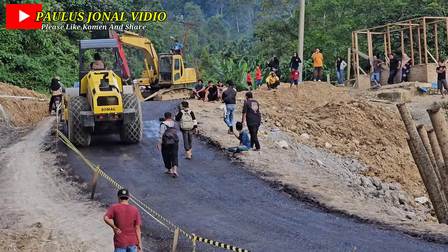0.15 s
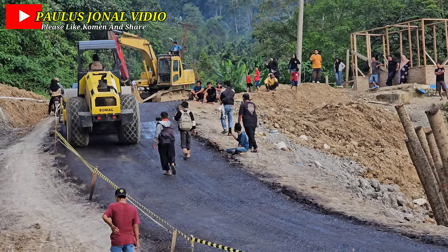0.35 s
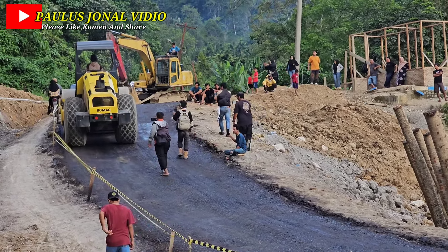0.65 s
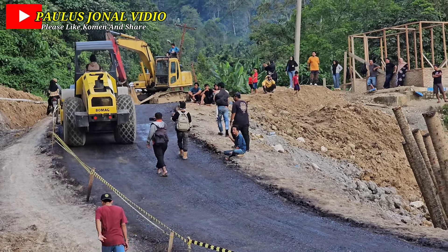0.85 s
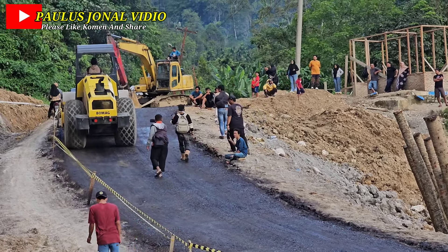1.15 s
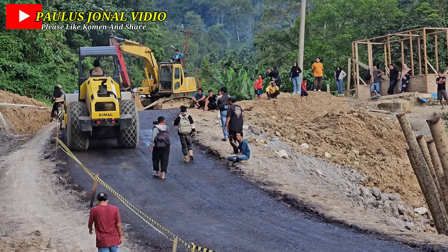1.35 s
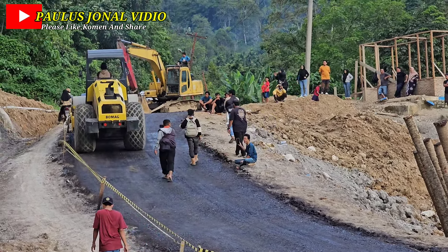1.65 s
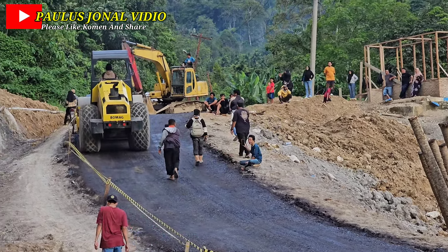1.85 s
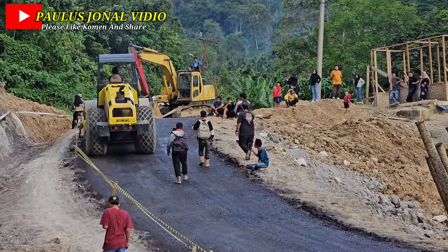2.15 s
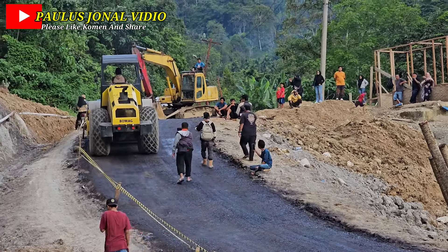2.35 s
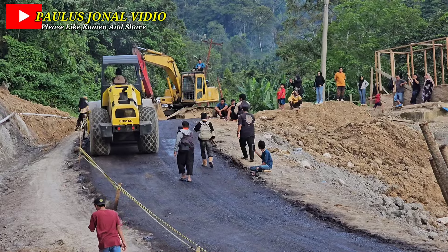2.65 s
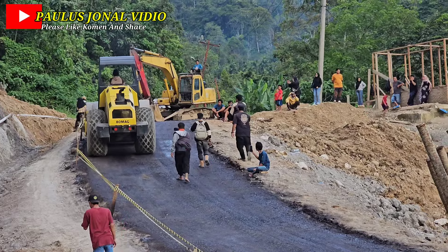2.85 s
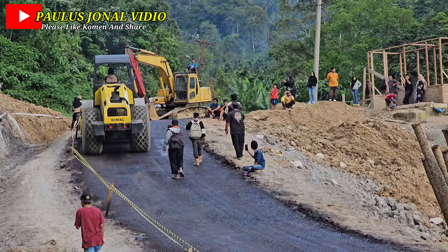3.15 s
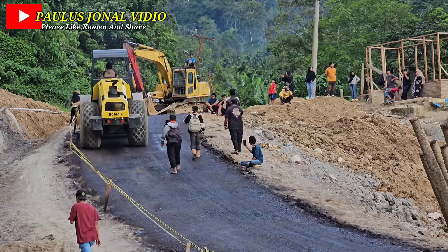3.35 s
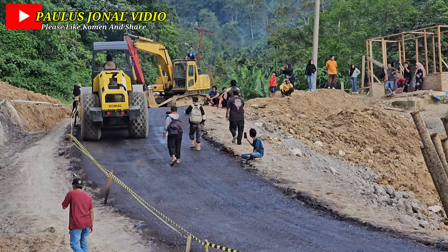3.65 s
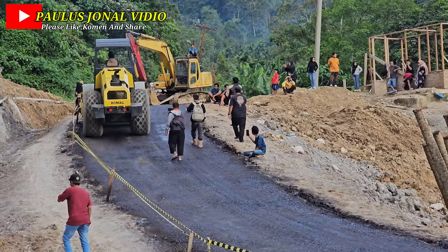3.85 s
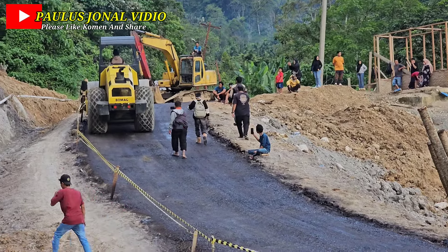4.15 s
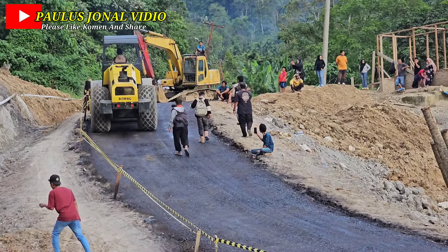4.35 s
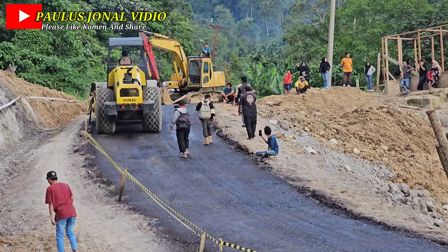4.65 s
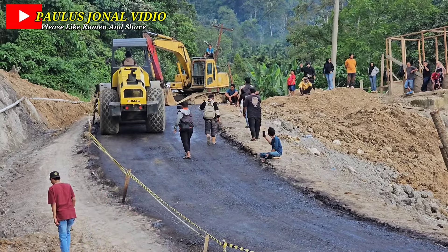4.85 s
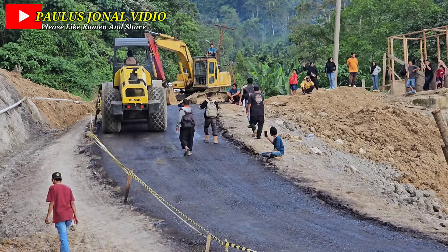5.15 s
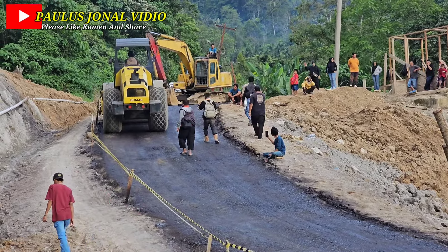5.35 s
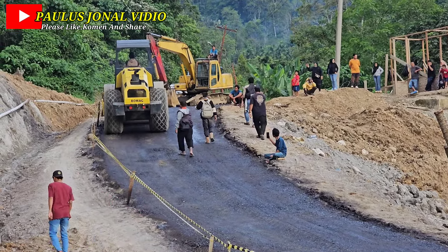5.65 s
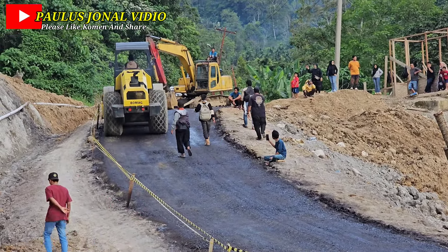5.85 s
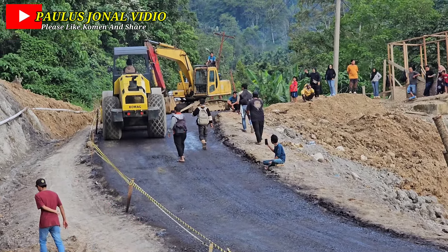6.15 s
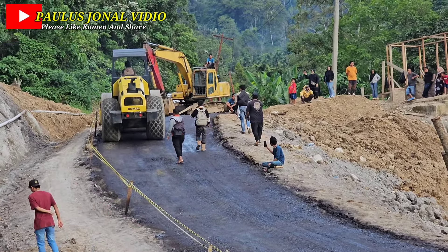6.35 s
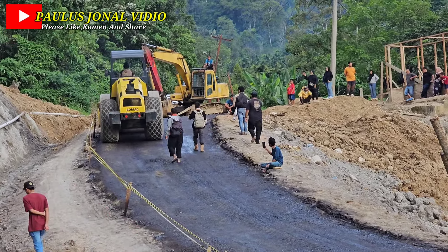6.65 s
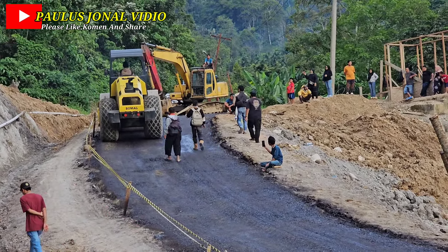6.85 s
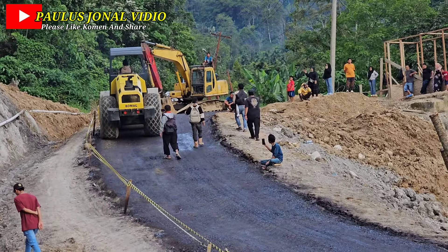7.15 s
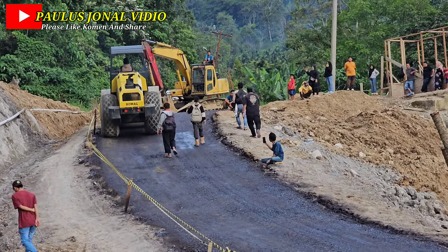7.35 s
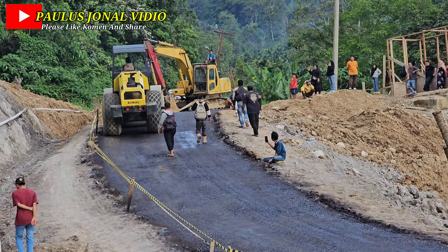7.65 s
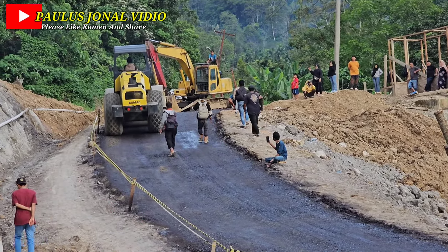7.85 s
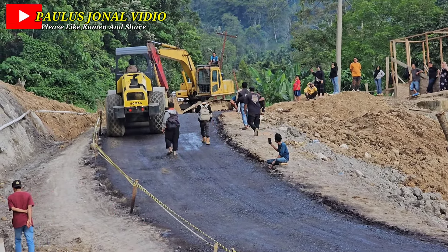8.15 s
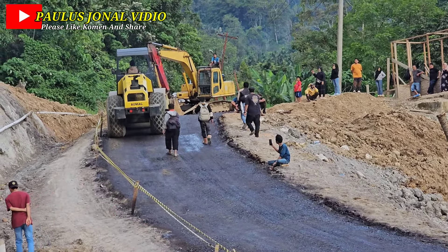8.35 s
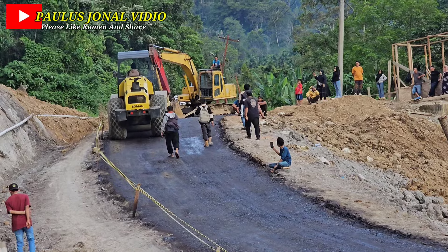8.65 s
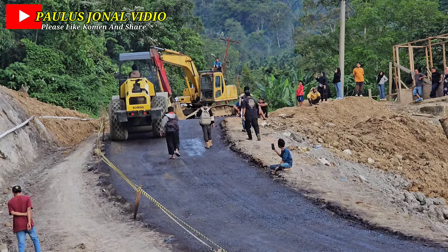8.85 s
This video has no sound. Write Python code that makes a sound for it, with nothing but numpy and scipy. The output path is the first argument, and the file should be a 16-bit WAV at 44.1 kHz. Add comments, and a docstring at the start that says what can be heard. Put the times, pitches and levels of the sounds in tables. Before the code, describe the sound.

Outdoors at a roadworks, a road roller some thirty metres away runs throughout with a very deep, steady diesel hum, a rough roar, fast clatter and a wavering hydraulic whine. Around four seconds it grows duller as it moves off and hiss on the right fades. Faint squeaks and clinks come and go; a hollow knock sounds just after six seconds. Stereo microphone in the open, at a distance.

```python
"""A deep diesel hum first: a road roller drives slowly up a freshly laid road, some thirty metres off.
Its four cylinders fire 61 times a second; tones locked to the engine add a fan and a nine-piston pump's whine.
Shaped noise, its repeating part gated by the firings, makes roar and clatter; after about 4 s it is duller
and a right-hand hiss fades. A hollow knock (ringing modes) and a few clinks (noise bursts) come from the site;
faint brief squeaks and longer thin whines are narrow bands, some gliding."""
import sys
import numpy as np
from scipy import signal
from scipy.fft import rfft, irfft
from scipy.io import wavfile

SR = 44100
rng = np.random.default_rng(int(sys.argv[2]) if len(sys.argv) > 2 else 0)


def store_pcm(level_fs):
    """Save levels as 16-bit WAV."""
    pcm = np.round(np.clip(level_fs, -1, 1) * 32767).astype(np.int16)
    wavfile.write(sys.argv[1], SR, np.atleast_2d(pcm).T)


N = 396900
TIME = np.arange(N) / SR  # s
BIN_HZ = np.maximum(np.arange(N // 2 + 1) * SR / N, 1)
CUTOFF_HZ = 15500
CYLINDERS = 4
LEFT_LEAD_NEAR_S, LEFT_LEAD_FAR_S = 0.000294, 0.000095


def from_db(db):
    """Decibels to gain."""
    return np.exp(np.asarray(db, np.float32) * np.float32(np.log(10) / 20))


def rms_one(x):
    """Scale to unit power."""
    return x / np.sqrt(np.mean(x ** 2) + 1e-20)


def in_time(rows):
    """Each column of a time table at every sample."""
    s, *columns = np.transpose(rows)
    return [np.interp(TIME, s, column) for column in columns]


def at_hz(rows, hz):
    """Each column of a spectrum table at the given frequencies, on a log scale."""
    points, *columns = np.transpose(rows)
    return [np.interp(np.log(hz), np.log(points), column) for column in columns]


def drift(rate_hz):
    """Slow chance with spread 1, drawn at every 100th sample and joined by straight lines."""
    step = 100
    draws = rng.standard_normal(N // step + 2)
    hz = np.arange(len(draws) // 2 + 1) * SR / N
    lowpass = 1 / (1 + (hz / rate_hz) ** 2)
    slow = rms_one(irfft(rfft(draws) * lowpass, len(draws))).astype(np.float32)
    between = np.arange(step, dtype=np.float32) / step
    return (slow[:-1, None] + np.diff(slow)[:, None] * between).ravel()[:N]


def swell(period_s, crest_s):
    """A regular rise and fall between -1 and 1."""
    return np.cos(2 * np.pi * (TIME - crest_s) / period_s)


def bell(hz, width_hz):
    """A bell-shaped band of height 1."""
    return np.exp(-0.5 * ((BIN_HZ - hz) / width_hz) ** 2)


def pan(left_db):
    """Left and right gains for a left minus right level difference."""
    return from_db(np.float32([[0.5], [-0.5]]) * np.float32(left_db))


# stereo image: [f/Hz, left-right likeness/0-1, left minus right near/dB, same when farther/dB]
STEREO_IMAGE = [(61, 1, 5, 1.5), (250, 0.94, -2, 1), (535, 0.89, 10, 1.5), (830, 0.9, -4, 2.5),
                (1200, .9, 5.5, 1.5), (1990, 0.8, 7, 2.5), (3060, 0.4, -2, 1), (5140, .58, -8.5, -0.5),
                (7040, 0.6, 2, 6), (10000, 0.3, 11.5, 7.5), (15000, .15, -4, 3.5)]


def line_side(cycle, multiple, away):
    """Left minus right dB of a tone as the roller moves off."""
    _, near_db, far_db = at_hz(STEREO_IMAGE, multiple * cycle[-1] / TIME[-1])
    return near_db + (far_db - near_db) * away


BASS_TURN_RAD_HZ = 15  # advances the right side's phase by this / f: strongest in the bass


def line(cycle, multiple, level_db, left_db, shift_turns=0):
    """One stereo sine locked to the engine cycle, its right side shifted in phase."""
    hz = multiple * cycle[-1] / TIME[-1]
    turns = multiple * cycle + shift_turns
    angle = 2 * np.pi * (turns - np.floor(turns)).astype(np.float32)
    right_lag_rad = 2 * np.pi * hz * LEFT_LEAD_FAR_S - BASS_TURN_RAD_HZ / hz
    tone = np.sin(angle - np.float32([[0], [right_lag_rad]]))
    return 2 ** 0.5 * from_db(level_db) * pan(left_db) * tone


HUM_DB, HUM_SWING_DB, HUM_SWELL_S, HUM_CREST_S = -7.5, 0.72, 4.25, 2.8  # slow swell about a mean
HUM_LEFT_DB = 1.6
BEAT_S, BEAT_CREST_S = 1.39, 1.55  # overtones beat with an echo as the roller moves
# exhaust overtones before the beat: [firing harmonic, start level/dB, fade/dB per s,
# share of the whine's swing/dB per dB, echo share (negative: cancels at the crest)]
EXHAUST_OVERTONES = [(2, -24, 0.46, 0, 0.27), (3, -31.5, 0.5, 0.4, -0.53)]


def exhaust(cycle, away, hum_flutter_db=0.25, overtone_flutter_db=1.4):
    """Four firings a cycle; the silencer leaves a deep hum, its overtones locked to it and beating with an echo."""
    hum_db = HUM_DB + HUM_SWING_DB * swell(HUM_SWELL_S, HUM_CREST_S) + hum_flutter_db * drift(6.4)
    out = line(cycle, CYLINDERS, hum_db, HUM_LEFT_DB)
    beat = swell(BEAT_S, BEAT_CREST_S)
    for harmonic, start_db, fade_db_per_s, follows, echo in EXHAUST_OVERTONES:
        multiple = CYLINDERS * harmonic
        level_db = start_db - fade_db_per_s * TIME + follows * whine_swing()
        level_db = level_db + overtone_flutter_db * drift(22)
        echo_gain = np.sqrt(1 + echo ** 2 + 2 * echo * beat)
        out += echo_gain * line(cycle, multiple, level_db, line_side(cycle, multiple, away))
    return out


# pump whine: [t/s, 2nd piston harmonic level/dB, 3rd piston harmonic level/dB]
PUMP_WHINE = [(0, -27.5, -38), (0.9, -34, -37), (2.1, -34.5, -37), (3.3, -32, -38.5), (3.95, -26, -45.5),
              (4.9, -30.5, -41), (5.6, -33, -43), (5.85, -40, -45), (6.4, -31.5, -42.5), (6.9, -29.5, -45),
              (7.3, -33.5, -46.5), (9, -35, -46.5)]


def whine_swing():
    """The 2nd piston harmonic's dB above its mean; parts of exhaust and roar swell with it."""
    whine_db = in_time(PUMP_WHINE)[0]
    return whine_db - whine_db.mean()


# pump overtones: [piston harmonic, level near/dB, level farther/dB]
PUMP_OVERTONES = [(5, -58.5, -50.5), (6, -56.5, -54), (7, -59, -49), (8, -63, -59), (9, -60, -64),
                  (11, -65, -61), (16, -66.5, -67)]


def pump(cycle, away, flutter_db=1.5, overtone_flutter_db=3.5, wander_turns=0.098):
    """Nine pistons, two turns a cycle: a whine on harmonics 2 and 3, with thin, wavering overtones."""
    strokes = 18  # per engine cycle
    out = 0
    for harmonic, whine_db in enumerate(in_time(PUMP_WHINE), 2):
        multiple = strokes * harmonic
        level_db = whine_db + flutter_db * drift(5.6)
        out = out + line(cycle, multiple, level_db, line_side(cycle, multiple, away))
    for harmonic, near_db, far_db in PUMP_OVERTONES:
        multiple = strokes * harmonic
        level_db = near_db + (far_db - near_db) * away + overtone_flutter_db * drift(13)
        side_db = line_side(cycle, multiple, away)
        out += line(cycle, multiple, level_db, side_db, wander_turns * drift(16))
    return out


FAN_PER_CYCLE = 15.953  # blade passes, just under the 4th firing harmonic
# fan tone: [t/s, level/dB]
FAN_TONE = [(0, -28), (.3, -30), (.85, -36.5), (1.4, -33), (2.2, -37.5), (2.7, -33), (3.5, -37),
            (4.15, -28.5), (4.65, -43), (5.1, -35), (6.3, -39.5), (7.1, -35), (7.7, -42.5), (9, -48)]


def fan(cycle, away, flutter_db=1.5):
    """The belt-driven cooling fan hums at its blade rate."""
    level_db = in_time(FAN_TONE)[0] + flutter_db * drift(13)
    return line(cycle, FAN_PER_CYCLE, level_db, line_side(cycle, FAN_PER_CYCLE, away))


# weaker lines: [multiple of the four-stroke cycle rate (tone rounds it), level near/dB, level farther/dB]
ENGINE_ORDERS = [(2, -47.5, -42.5), (3, -42, -36.5), (6, -47.5, -40), (7, -37.5, -35), (9, -41, -42),
                 (15, -41, -48), (17, -51.5, -47.5), (18, -51, -48.5), (20, -43, -46.5), (21, -46.5, -50),
                 (23, -45, -56.5), (26, -47, -56.5), (32, -60, -39.5), (34, -54.5, -45), (35, -48, -41),
                 (38, -50.5, -46.5), (39, -48.5, -48.5), (41, -43.5, -48), (42, -46.5, -49.5),
                 (44, -44.5, -47.5), (46, -47, -51), (48, -43, -57.5), (52, -42, -54.5), (55, -41.5, -50),
                 (56, -51, -51), (58, -58, -54), (60, -59, -52), (63.9, -60, -50), (66.14, -59.5, -50),
                 (77, -52, -54.5), (77.9, -55, -51.5), (85.5, -53.5, -58.5), (90, -55.5, -52.5),
                 (90.8, -56.5, -53), (94, -58, -54.5), (130.2, -59.5, -52.5)]


def engine_lines(cycle, away, waver_db=2.0, wander_turns=0.15):
    """Unequal cylinders and driven gear add weaker lines on and between the firing harmonics; echoes shift them."""
    out = 0
    for multiple, near_db, far_db in ENGINE_ORDERS:
        level_db = near_db + (far_db - near_db) * away + waver_db * drift(5.3)
        shift_turns = rng.random() + wander_turns * drift(3.0)
        side_db = line_side(cycle, multiple, away)
        out = out + line(cycle, round(multiple), level_db, side_db, shift_turns)
    return out


# unequal knock of the cylinders, in firing order: [relative level/dB]
CYLINDER_KNOCK_DB = [0.9, 0.87, -0.3, -0.9]


def firing_gate(cycle, depth=0.44, fade_per_firing=9.0):
    """Every firing starts a burst of clatter that dies before the next, over a steady floor."""
    firing = cycle * CYLINDERS
    strength = from_db(CYLINDER_KNOCK_DB)[firing.astype(int) % CYLINDERS]
    return rms_one(strength * (1 + depth * np.exp(-fade_per_firing * (firing % 1))))


RIPPLE_DB, RIPPLE_SPACING_HZ, RIPPLE_FROM_HZ = 2.5, 65.7, 3000


def ripple(count=400):
    """Chance peaks and dips, in dB, that small panels add to the treble."""
    heights = np.interp(BIN_HZ / RIPPLE_SPACING_HZ, np.arange(count), rng.standard_normal(count))
    return RIPPLE_DB * heights / (1 + (RIPPLE_FROM_HZ / BIN_HZ) ** 2)


# base spectrum of the roar: [f/Hz, density near/dB per Hz, density farther/dB per Hz]
ROAR_SPECTRUM = [(26, -54, -58.5), (103, -48.5, -50), (152.5, -46.5, -49), (186, -57, -62),
                 (215, -58.5, -64), (312, -59.5, -61.5), (480, -71, -61), (640, -65.5, -63),
                 (1180, -65.5, -67), (2480, -80.5, -75.5), (3600, -80, -80.5), (6560, -89.5, -92.5),
                 (8550, -102.7, -102.5), (11700, -92, -99.5), (15500, -102.3, -105.1)]
# resonances of block and hood: [f/Hz, width/Hz, lift near/dB, lift farther/dB]
PANEL_RESONANCES = [(585, 61, 5, 4), (760, 80, 7.5, -1.5), (835, 35, 3.5, 0), (1014, 41, -9, 5),
                    (1170, 35, 2.5, 2.5), (1420, 120, 2.5, 4), (1831, 18, 5, 6), (1946, 57, 8, 4.5),
                    (2210, 22, 1, 3), (2450, 14, 6, 0.5), (2810, 190, 8, 1), (3020, 36, 1.5, 3.5),
                    (3900, 58, 4, -0.5), (4670, 260, 9.5, 1.5), (5330, 170, 8.5, 1), (5950, 200, 4.5, -1),
                    (7600, 300, 5, 4)]
# clatter that repeats with every engine cycle: [f/Hz, share/0-1]
REPEATING_SHARE = [(200, 0.03), (500, 0.22), (1000, 0.3), (2500, 0.2), (5000, 0), (9000, 0.2)]


def roar(cycle, index, lead_s, flicker_db=0.92, grain_db=1.17):
    """Valves, injectors and fan ring block and hood: a gated pattern repeating each cycle, plus turbulence."""
    pattern = rng.standard_normal(round(SR * TIME[-1] / cycle[-1]))
    place = (cycle % 1 * len(pattern)).astype(int)
    flicker = from_db(flicker_db * drift(11))
    repeating = rfft(flicker * firing_gate(cycle) * pattern[place])
    grain = from_db(grain_db * drift(150))
    noise = flicker * grain * rng.standard_normal((3, N))
    turbulent, *scattered = rfft(noise.astype(np.float32))
    share = np.clip(at_hz(REPEATING_SHARE, BIN_HZ)[0], 0, 1)
    direct = np.sqrt(share) * repeating + np.sqrt(1 - share) * turbulent
    # direct sound reaches the left first; what the banks scatter differs on each side
    alike, *left_db = at_hz(STEREO_IMAGE, BIN_HZ)
    alike = np.clip(alike, 0, 1)
    arrival = np.exp(-2j * np.pi * BIN_HZ * lead_s * np.array([[0], [1]]))
    both = np.sqrt(alike) * direct * arrival + np.sqrt(1 - alike) * np.array(scattered)
    colour_db = at_hz(ROAR_SPECTRUM, BIN_HZ)[index] + ripple()
    for hz, width_hz, *lift_db in PANEL_RESONANCES:
        colour_db = colour_db + lift_db[index] * bell(hz, width_hz)
    sides = pan(left_db[index])
    sides = sides / np.sqrt(np.mean(sides ** 2, axis=0))
    return irfft(both * sides * from_db(colour_db), N) * np.sqrt(SR / 2)


LOW_MID_HZ, LOW_MID_WIDTH_HZ = 360, 34
HIGH_MID_HZ, HIGH_MID_WIDTH_HZ = 740, 40
RUSH_HZ, RUSH_WIDTH_HZ, RUSH_FOLLOWS = 676, 47, 0.94  # follows: dB per dB of the whine's swing
# middle bands of the roar: [t/s, low band level/dB, high band level/dB]
MID_LEVELS = [(0, 2, 1.5), (1.5, 1, -1.5), (3, -2.5, 0.5), (4.4, -4, 0.5), (5.1, -0.5, 2.5), (6, 2, 0.5),
              (7.1, -3.5, -2), (8, 0.5, -3.5), (8.7, 3.5, -3)]
# treble of the roar: [t/s, clatter level/dB, top hiss level/dB]
TREBLE_LEVELS = [(0, 1.5, -2.5), (1, 1, -2.5), (1.8, 0.5, -1), (2.02, 2, 2), (2.25, 0.5, -1.5),
                 (3.9, -0.8, -4.5), (5.1, 0.1, 0.7), (7.3, -0.9, -1.8), (9, -1.5, -1)]
# low rumble: [t/s, level/dB]
RUMBLE_LEVEL = [(0, -2.5), (.55, 4.5), (1.15, -1.5), (1.6, 3.5), (2.1, 0.5), (3, 1.5), (3.8, 1.5),
                (4.4, 2.5), (5, 0), (5.9, 1), (6.5, 4), (7.1, 5), (7.9, 6.5), (9, 2)]


def machine_noise(cycle, away, rumble_top_hz=250, hiss_from_hz=8500, flutter_db=0.8, lumpy_db=0.4):
    """The roar dulls with distance: lumpy rumble, shifting middle, a rush following the pump, unsteady top hiss."""
    near = roar(cycle, index=0, lead_s=LEFT_LEAD_NEAR_S)
    far = roar(cycle, index=1, lead_s=LEFT_LEAD_FAR_S)
    rest = rfft(np.sqrt(1 - away) * near + np.sqrt(away) * far)
    low_mid_db, high_mid_db = in_time(MID_LEVELS)
    clatter_db, hiss_db = in_time(TREBLE_LEVELS)
    rumble_db = in_time(RUMBLE_LEVEL)[0] + lumpy_db * drift(14)
    bass = 1 / (1 + (BIN_HZ / rumble_top_hz) ** 4)
    top = 1 / (1 + (hiss_from_hz / BIN_HZ) ** 8)
    bands = [
        (bell(LOW_MID_HZ, LOW_MID_WIDTH_HZ), low_mid_db),
        (bell(HIGH_MID_HZ, HIGH_MID_WIDTH_HZ), high_mid_db),
        (bass, rumble_db),
        (bell(RUSH_HZ, RUSH_WIDTH_HZ), RUSH_FOLLOWS * whine_swing()),
        (top, hiss_db + flutter_db * drift(120)),
    ]
    out = 0
    for share, level_db in bands:  # each band takes its share of what is left
        out = out + from_db(level_db) * irfft(rest * share, N)
        rest = rest * (1 - share)
    return out + from_db(clatter_db) * irfft(rest, N)


def ring(drive, hz, t60_s):
    """A unit click sets a decaying sine of starting height 1 ringing."""
    r, w = from_db(-60 / (t60_s * SR)), 2 * np.pi * hz / SR
    return signal.lfilter([0, np.sin(w)], [1, -2 * r * np.cos(w), r * r], drive + 1e-18)


# knock and its rebound: [t/s, level/dB]
KNOCK_BLOWS = [(6.2117, -6.5), (6.217, -2.5)]
# modes of the hollow body: [f/Hz, level/dB, t60/s]
HOLLOW_MODES = [(338, -29, .25), (380, -27, .22), (445, -20, .17), (538, -17.5, 0.058), (643, -17, .08),
                (862, -27, 0.073), (1020, -19.5, 0.12), (1173, -24, .14), (1365, -18.5, .26),
                (1554, -27.5, .16), (1780, -26.5, .18), (1986, -27, .12), (2290, -41, .1), (3200, -41, .1)]


def knock(scatter_db=-16, scatter_s=0.038, build_cycles=2.13, contact_hz=2800, rise_s=0.005):
    """A soft blow and its rebound ring a hollow body; the banks scatter a dull tail that swells and dies."""
    count, start = SR // 2, int(KNOCK_BLOWS[0][0] * SR) - SR // 20
    now = TIME[start:start + count]
    body, tail = np.zeros(count), np.zeros(count)
    for s, blow_db in KNOCK_BLOWS:
        age_s = np.maximum(now - s, 0)
        envelope = (1 - np.exp(-age_s / rise_s)) * np.exp(-age_s / scatter_s)
        tail += from_db(blow_db + scatter_db) * envelope
        for hz, mode_db, t60_s in HOLLOW_MODES:
            late_s = (build_cycles + rng.uniform(-0.5, 0.52)) / hz  # low modes speak later
            blow = signal.unit_impulse(count, int((s + late_s) * SR) - start)
            body += from_db(blow_db + mode_db) * ring(blow, hz, t60_s)
    band = signal.butter(2, [330, 1600], "band", fs=SR, output="sos")
    scattered = signal.sosfilt(band, tail * rng.standard_normal((2, count)))
    contact = signal.butter(2, contact_hz, fs=SR, output="sos")
    soft = signal.sosfilt(contact, pan(1.5) * body + scattered)
    return np.pad(soft, ((0, 0), (start, N - start - count)))


# clinks and clicks of stone and tools: [t/s, level/dB, f/Hz, width/Hz, decay/s, left minus right/dB]
CLINK_BURSTS = [(.076, -42, 4400, 3980, 0.033, 1), (.692, -41, 5000, 5000, 0.005, 0),
                (1.28, -53, 7000, 7000, 0.023, 7), (2.33, -63, 11000, 6000, .012, -0.5),
                (3.67, -55, 12000, 6000, .012, -3), (5.464, -50, 9000, 7960, 0.0054, 4),
                (8.342, -36, 1600, 600, .025, 4.5), (8.355, -38.5, 2750, 900, .035, 3)]


def clinks():
    """Each small contact is a short, decaying noise burst in one band."""
    out, count = np.zeros((2, N)), SR // 3
    for s, level_db, hz, width_hz, decay_s, left_db in CLINK_BURSTS:
        edges_hz = [max(hz - width_hz / 2, 100), min(hz + width_hz / 2, CUTOFF_HZ)]
        band = signal.butter(2, edges_hz, "band", fs=SR, output="sos")
        noise = rms_one(signal.sosfilt(band, rng.standard_normal((2, count))))
        burst = noise * np.exp(-TIME[:count] / decay_s)
        start = int(s * SR)
        out[:, start:start + count] += from_db(level_db) * pan(left_db) * burst
    return out


# brief squeaks and longer thin whines: [t/s, level/dB, start f/Hz, end f/Hz, length/s, width/Hz]
SQUEAKS_AND_WHINES = [(0, -50, 2450, 2470, 1, 6), (2.3, -50, 4050, 3880, .11, 40),
                      (2.34, -50, 4530, 4390, .11, 70), (2.569, -53, 4900, 4800, .13, 60),
                      (3.21, -54, 4800, 4900, .13, 70), (4.918, -48, 3280, 3300, .03, 50),
                      (4.94, -48, 3570, 3520, .055, 110), (5.022, -51, 3170, 2800, .06, 80),
                      (5, -59, 2482, 2482, .9, 12), (6.299, -52, 1940, 1947, 1, 30),
                      (7.45, -47.5, 1945, 1945, .9, 30), (8.55, -47, 1940, 1940, .44, 33),
                      (6.892, -56, 4420, 4340, .26, 40), (7.4, -57, 3020, 3020, 1.6, 39),
                      (8.118, -44.5, 2330, 2000, .18, 90), (8.313, -52, 3230, 3360, .1, 70)]


def squeaks_and_whines():
    """Brief squeaks and longer thin whines: a rough, narrow band that may glide, swells and fades."""
    out = np.zeros(N)
    for s, level_db, start_hz, end_hz, length_s, width_hz in SQUEAKS_AND_WHINES:
        span = slice(int(s * SR), int((s + length_s) * SR))
        progress = np.linspace(0, 1, span.stop - span.start)
        angle = 2 * np.pi * np.cumsum(start_hz + (end_hz - start_hz) * progress) / SR
        rough = drift(width_hz)[span] * np.sin(angle) + drift(width_hz)[span] * np.cos(angle)
        envelope = np.sin(np.pi * np.sqrt(progress))
        out[span] += from_db(level_db) * envelope * rms_one(rough)
    return out


# engine speed, held nearly steady by the governor: [t/s, firing rate/Hz]
FIRING_RATE = [(0, 60.42), (0.6, 60.71), (1.45, 61.64), (2.15, 61.02), (2.85, 61.25), (3.45, 60.93),
               (4.2, 60.47), (4.8, 61.14), (5.5, 61.02), (5.95, 61.39), (6.5, 61.06), (9, 61.25)]
# moving off: [t/s, share of the farther sound/0-1]
AWAY_SHARE = [(0, 0.24), (3.3, 0.31), (3.75, 0.65), (4.2, 0.97), (4.7, 1), (9, 0.99)]


def scene(wobble_cycles=0.0007):
    """One crankshaft drives the machine; each cylinder fires once in a four-stroke cycle."""
    cycle = 1 + np.cumsum(in_time(FIRING_RATE)[0]) / SR / CYLINDERS + wobble_cycles * drift(6)
    away = np.clip(in_time(AWAY_SHARE)[0], 0, 1).astype(np.float32)
    roller = exhaust(cycle, away) + pump(cycle, away) + fan(cycle, away)
    roller = roller + engine_lines(cycle, away) + machine_noise(cycle, away)
    return roller + knock() + clinks() + squeaks_and_whines()


FULL_SCALE = 1.02


def record(dry, hardness=14):
    """The highest crests are rounded and the top is cut steeply."""
    rounded = dry / (1 + np.abs(dry / FULL_SCALE) ** hardness) ** (1 / hardness)
    # a mirrored lead-in lets the filter settle
    lead_in = np.pad(rounded, ((0, 0), (2000, 0)), mode="reflect", reflect_type="odd")
    steep = signal.ellip(10, 0.1, 80, CUTOFF_HZ, fs=SR, output="sos")
    return signal.sosfilt(steep, lead_in)[:, -N:]


dry = scene()
out = record(dry)
store_pcm(out)
```